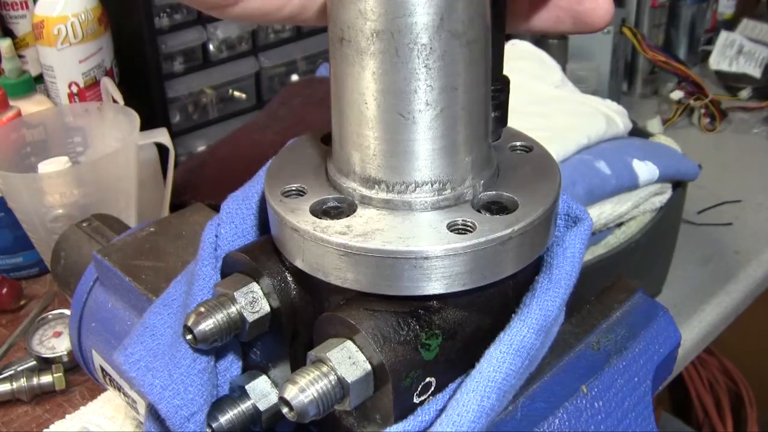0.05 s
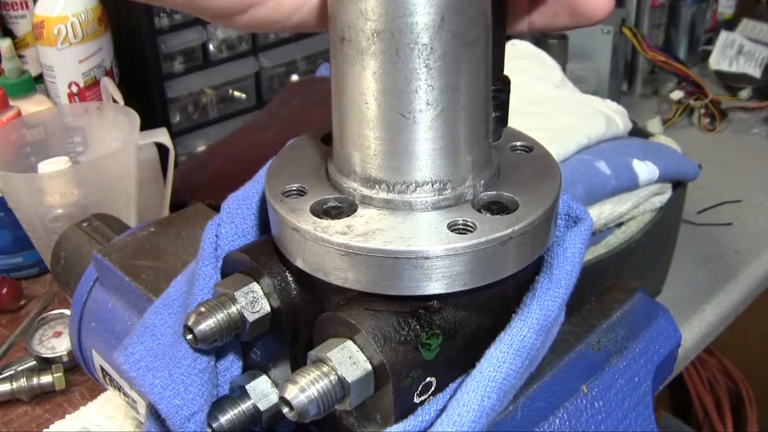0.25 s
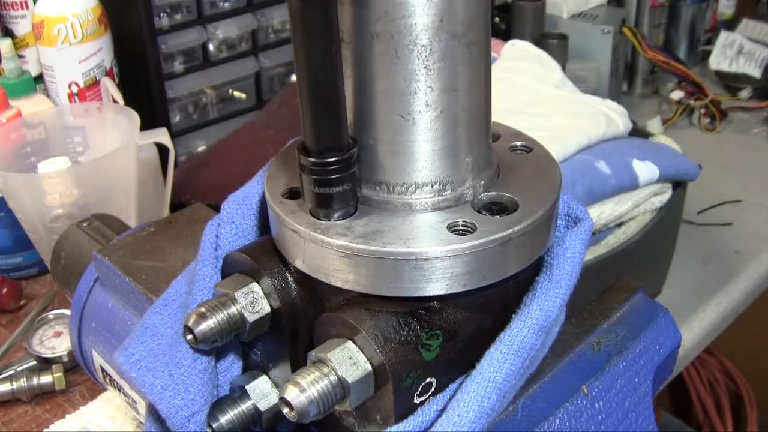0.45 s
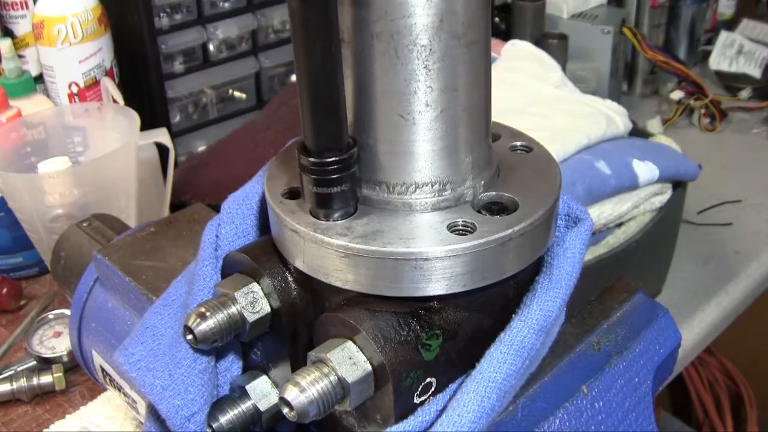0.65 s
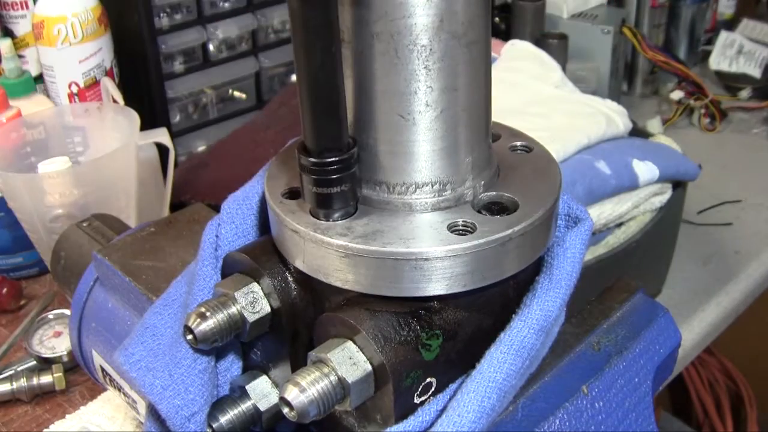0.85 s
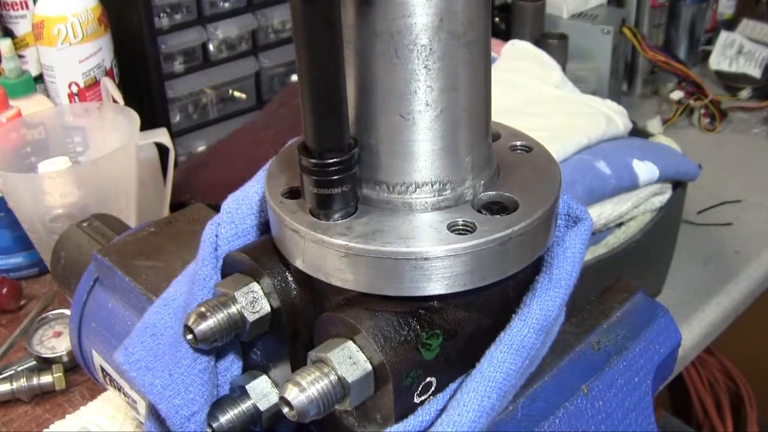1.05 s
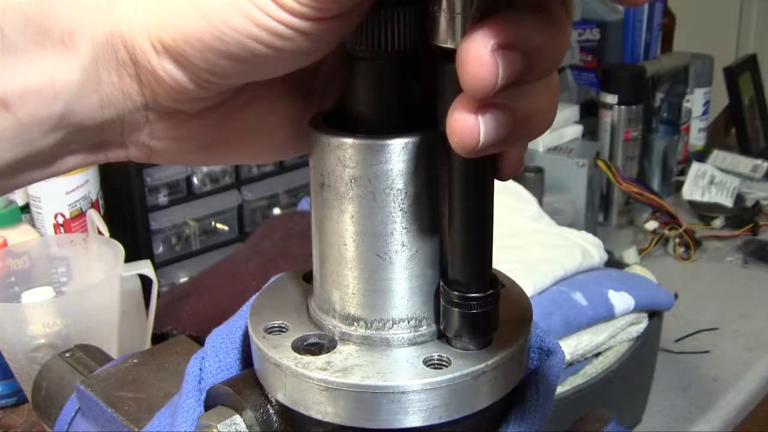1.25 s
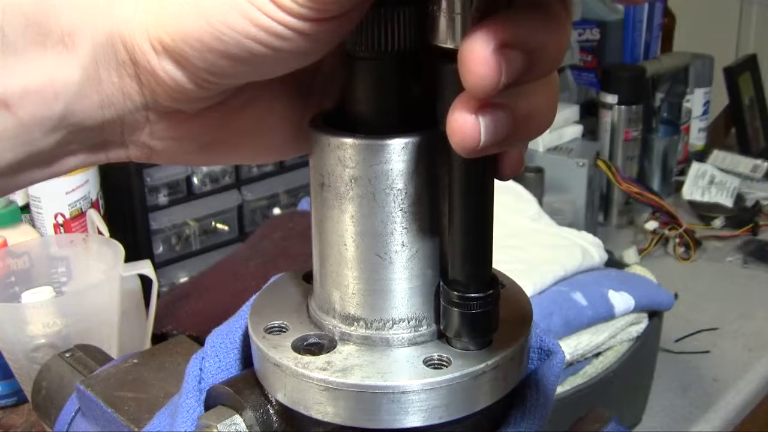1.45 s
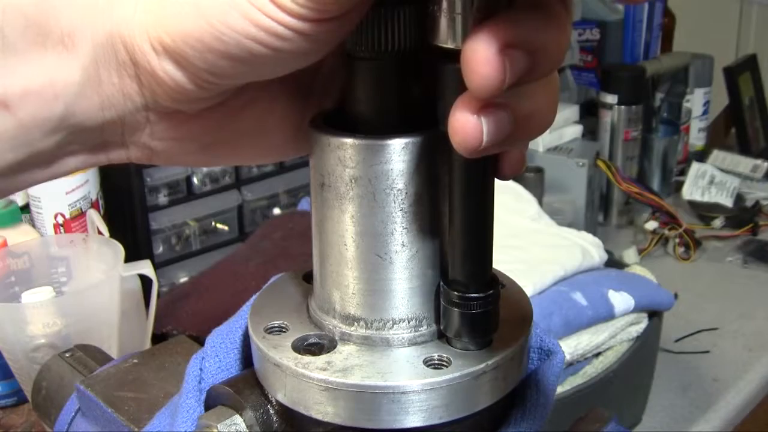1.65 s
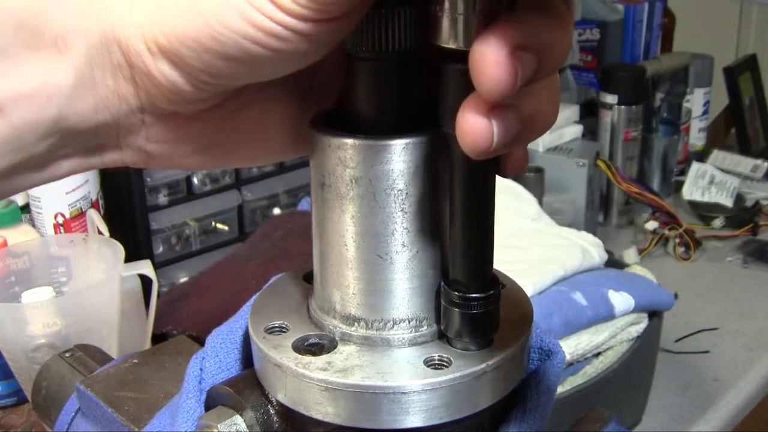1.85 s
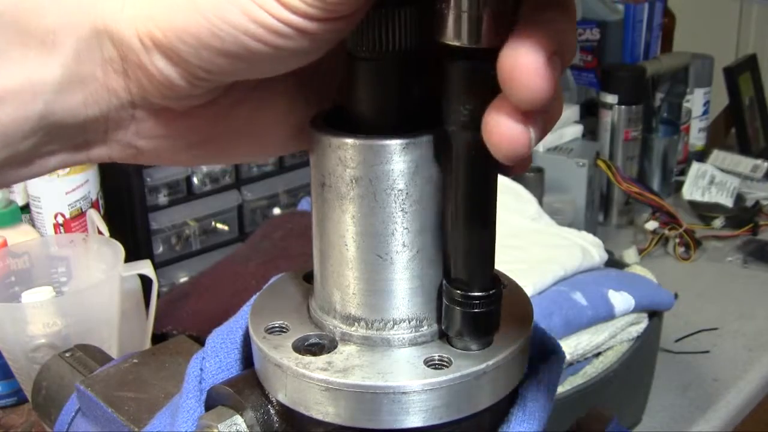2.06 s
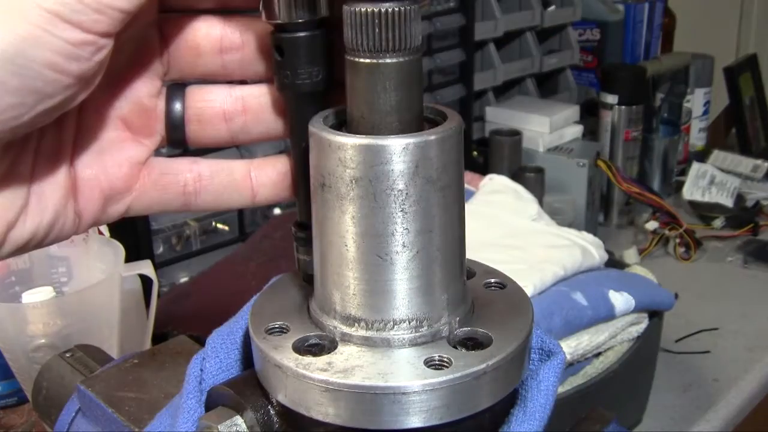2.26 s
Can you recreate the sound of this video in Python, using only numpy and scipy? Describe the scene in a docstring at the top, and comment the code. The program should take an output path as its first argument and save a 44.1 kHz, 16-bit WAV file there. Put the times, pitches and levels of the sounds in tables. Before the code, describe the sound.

Five sharp, close metal snaps come in quick succession as a socket wrench loosens bolts, each followed by a dull workbench thump. Light socket taps and a short rattle fall between them, over faint rumble in a small garage.

```python
"""A soft rustle dies away over faint low rumble and hiss in a small garage. From 0.2 s a socket on a long
extension cracks five bolts loose on a metal flange held in a bench vice. Each lets go with one sharp
snap that rings the steel briefly; the bench clunks and booms just behind it, and the garage answers.
The socket taps twice after the first bolt and rattles after the third, each time with a dull nudge of
the bench. The fifth bolt goes at 1.9 s, and one last light tap follows."""
import sys
import numpy as np
from scipy import signal
from scipy.io import wavfile
from scipy.ndimage import map_coordinates

SR = 44100
rng = np.random.default_rng(int(sys.argv[2]) if len(sys.argv) > 2 else 0)


def unload_audio(sound):
    """Save the sound as a 16-bit wav file, at the path given as the first command line argument."""
    columns = np.transpose(np.atleast_2d(sound))
    # keep every value between -1 and 1, then stretch to whole-number steps
    steps = np.round(np.clip(columns, -1, 1) * 32767)
    wavfile.write(sys.argv[1], SR, steps.astype(np.int16))


N = 105840
TIME = np.arange(N) / SR

# tone of the noise bed, the opening rustle and the bench's shudder: frequency_hz, density_db
BED_SPECTRUM = [(15, -43), (25, -24.5), (64, -2), (108, -12.5), (134, -21), (263, -10.5), (354, -24.5),
                (384, -22), (451, -18), (887, -27), (1370, -26.5), (13600, -47), (16000, -58)]
RUSTLE_SPECTRUM = [(60, -2), (300, 4.5), (1300, -8), (4000, -13.5), (6500, -22.5), (12000, -36.5)]
SHUDDER_SPECTRUM = [(30, -29), (47, -16), (68, -1), (100, 0.5), (150, -9), (220, -6.5), (330, -4.5),
                    (480, -19), (1000, -40)]
# fader ride on the rumble: time_s, level_db
RUMBLE_RIDE = [(0.0, -52.5), (0.33, -51.5), (0.49, -54.5), (0.66, -58.5), (1.08, -51.5), (1.3, -59),
               (1.72, -60.5), (2.02, -57.5), (2.4, -59)]
# how alike left and right are in diffuse sound: frequency_hz, likeness (0-1)
STEREO_LIKENESS = [(80, 0.97), (300, 0), (1200, 0.6), (5000, 0.6), (12000, 0)]
# reflections from the clutter on the bench, and the garage tail: frequency_hz, level_db, t60_s
CLUTTER_REVERB = [(80, -23.5, .06), (400, -4.5, .07), (1200, 1, 0.096), (3000, -3.5, 0.014),
                  (7000, -11.5, .035), (15000, -9, .03)]
GARAGE_REVERB = [(80, -18, 1), (324, -9.5, 0.35), (600, -12.5, 0.49), (1239, -3.5, 0.38), (2400, -15, .34),
                 (4100, -16.5, 0.38), (4870, -16, 0.12), (6340, -17.5, .34), (10000, -14.5, 0.097),
                 (15000, -23.5, .2)]
# bands that cancel on the direct path to the microphone: centre_hz, width_hz, depth (0-1)
PATH_NOTCHES = [(930, 330, 0), (5230, 290, 0.1), (8240, 280, 0.8)]

# resonances: pitch_hz, width_hz, level_db
BOOM_MODES = [(75.6, 8.7, 0), (87.3, 15, 18), (134, 8, 11), (195, 12, 10.5)]  # bench and room, slow to build
CLUNK_MODES = [(275, 17, 2), (342, 100, 3), (400, 110, -2.5)]  # hollow bench top
TAP_MODES = [(646, 120, 4.5), (1050, 410, 8.5), (1814, 1200, 2.5), (2750, 500, 5), (3650, 900, 2.5),
             (5370, 900, 0.5), (8890, 960, -1)]  # woken by a light touch
WRENCH_MODES = [(2143, 62, -4), (2916, 350, -10.5), (8300, 350, -12.5), (9630, 600, -10)]  # damped, the same for every bolt
BITE_MODES = [(3083, 700, -11), (3872, 510, 3), (4328, 520, -2.5)]  # the socket's bite
BRIGHT_MODES = [(5800, 190, -13.5), (6290, 240, -0.5), (6756, 280, -7.5), (7287, 260, -8), (9784, 600, -8)]  # the bolt's bright edge
KNOCK_MODES = [(557, 100, -4.5), (670, 60, 2)]  # damped flange and vice
BAR_RINGS = [
    [(990, 69, -3)],
    [(1243.4, 69, -6), (1310, 63, -1)],
    [(1650, 130, -2.5)],
]  # longer rings of the extension bar, in three sets: low, middle, high
AFTER_RING_MODES = [(1307, 4, -7), (1344.3, 8, -11), (1400, 4.8, -18.5)]  # faint, goes with the middle ring
SPRAY_BANDS = [(1920, 1600, -9), (3000, 580, -10.5), (5200, 810, -8.5), (7900, 2000, -12)]  # the snap's even spray into the room
# wave round trips in the steel: delay_s, feedback (0-1)
ROUND_TRIPS = [(.00033, 0.67), (.00015, 0.17)]

# dull nudges of the bench: start_s, boom_db, clunk_db
BENCH_NUDGES = [(0.441, -14.5, -8), (1.192, -13, 0.5)]
# light touches of the socket: start_s, level_db, contact_cutoff_hz
SOCKET_TOUCHES = [(0.385, -28.5, 3580), (0.4522, -30, 3526), (1.1668, -17.5, 3550), (1.1789, -13.5, 15000),
                  (1.2012, -21, 8050), (1.2055, -22.5, 7000), (1.2094, -33, 13200), (1.2159, -27.5, 10000),
                  (1.2611, -20.5, 10000), (1.2636, -31.5, 11000), (2.064, -29, 8800)]
# bolts letting go: start_s, snap_db, contact_cutoff_hz, knock_db, socket_hz, socket_db, bite_db,
# bright_db, low_ring_db, middle_ring_db, high_ring_db, notch_hz, pan_db, room_db, boom_db, clunk_db
BOLT_CRACKS = [(0.1999, 18, 9000, 0.5, 2337, 20.5, 1, 5, 21, 27.5, 18, 3120, -1, 0, 6.5, 8),
               (0.6747, 17, 15000, -2, 2190, 5, 1, 7, -2.5, 12.5, 9.5, 2877, 1.5, 0.5, 4, 10.5),
               (0.987, 19, 8860, 0.5, 2394, 18, -1, 3, 24.5, 21.5, 14, 1960, 0.5, .5, 5, 6),
               (1.508, 14.5, 4600, -0.5, 2510, 14.5, 0.5, -0.5, -24, 9, 15, 2305, -3.5, -4, -2.5, 4),
               (1.8753, 19, 5940, 0, 2714, 16.5, 2, 2.5, 2, 24, 4.5, 2240, -4, -3.5, 1, -0.5)]


def from_db(db):
    """Decibels to gain."""
    return 10 ** (np.asarray(db) / 20)


def at_hz(table, hz, column=1):
    """Read a column of a table on a log-frequency axis."""
    table = np.array(table)
    return np.interp(np.log(hz), np.log(table[:, 0]), table[:, column])


def cut(x, hz, kind="low", order=2):
    """Butterworth filter."""
    sections = signal.butter(order, np.clip(hz, 10, .45 * SR), kind, fs=SR, output="sos")
    return signal.sosfilt(sections, x + 1e-18)


def click(start_s, level_db):
    """One impulse."""
    return from_db(level_db) * (np.arange(N) == int(start_s * SR))


def resonate(x, hz, width_hz):
    """One resonance, unity gain at its peak."""
    radius = np.exp(-np.pi * width_hz / SR)
    poles = [1, -2 * radius * np.cos(2 * np.pi * hz / SR), radius ** 2]
    return signal.lfilter(np.array([1, 0, -1]) * (1 - radius ** 2) / 2, poles, x + 1e-18)


def notch(x, hz, width_hz, depth):
    """Scoop out one band; depth 1 cancels its centre."""
    return x - depth * resonate(x, hz, width_hz)


def body(x, modes):
    """Resonances in parallel, polarity alternating."""
    return sum((-1) ** k * from_db(db) * resonate(x, hz, width) for k, (hz, width, db) in enumerate(modes))


def swell(x, modes):
    """Resonances applied twice, so that they bloom before they fade."""
    return sum(from_db(db) * resonate(resonate(x, hz, width), hz, width) for hz, width, db in modes)


def noise_bands(size):
    """Half-octave bands of stereo white noise, as (centre_hz, band)."""
    edges = 22 * 2 ** np.arange(0, 10, .5)
    white = rng.standard_normal((2, 2, size + SR // 4))
    for k, (low, high) in enumerate(zip(edges, edges[1:])):
        mid, side = cut(white[k % 2], [low, high], "band")[:, -size:]
        hz = np.sqrt(low * high)
        alike = np.clip(at_hz(STEREO_LIKENESS, hz), 0, 1)
        yield hz, np.sqrt((1 + alike) / 2) * mid + np.sqrt((1 - alike) / 2) * side * [[1], [-1]]


def coloured(spectrum):
    """Steady stereo noise with the given tone, rms 1."""
    noise = sum(from_db(at_hz(spectrum, hz)) * band for hz, band in noise_bands(N))
    return noise / noise.std()


def pan(x, pan_db, treble_pan_db=2.03):
    """Pan the lows and mids (positive is left); the treble stays just left of centre."""
    lows, sides = cut(x, 4000, order=1), np.array([[.5], [-.5]])
    return lows * from_db(pan_db * sides) + (x - lows) * from_db(treble_pan_db * sides)


def background():
    """The bed: a drifting low rumble, faint steady hiss and a soft rustle dying away at the start."""
    bed, split_hz, rumble_trim_db = coloured(BED_SPECTRUM), 200, -1.5
    ride_db = np.interp(TIME, *np.transpose(RUMBLE_RIDE))
    rumble = from_db(ride_db + rumble_trim_db) * cut(bed, split_hz, order=1)
    hiss = from_db(-60) * cut(cut(bed, split_hz, "high", order=1), 14200, order=4)
    rustle = from_db(-51.5) * np.exp(-TIME / 0.033) * coloured(RUSTLE_SPECTRUM)
    return rumble + hiss + rustle


def reflections(send, reverb, delay_s, width):
    """Diffuse reverb, each band dying at its own rate; width is the share of side signal kept."""
    age, response = TIME[:SR] - delay_s, 0
    for hz, band in noise_bands(SR):
        t60_s = at_hz(reverb, hz, column=2)
        fade = (age > 0) * from_db(-60 * np.maximum(age, 0) / t60_s)
        response = response + from_db(at_hz(reverb, hz)) * band * fade / np.linalg.norm(fade)
    response = width * response + (1 - width) * response.mean(axis=0)
    return signal.fftconvolve(send[None], response, axes=1)[:, :N]


def direct_path(x, left_lag_s=6e-6):
    """Narrow bands cancel on the way to the microphone, whose left port is slightly further away."""
    for hz, width_hz, depth in PATH_NOTCHES:
        x = notch(x, hz, width_hz, depth)
    left = map_coordinates(x[0], [np.arange(N) - left_lag_s * SR], order=3)
    return np.array([left, x[1]])


def bench_boom(rise_s=0.025, decay_s=0.056):
    """Released torque or a nudge shakes the bench: a clunk, a late boom and a diffuse shudder."""
    boom_hits = clunk_hits = shake = 0
    for start_s, *_, boom_db, clunk_db in BOLT_CRACKS + BENCH_NUDGES:
        boom_hits += click(start_s + .015, boom_db)
        clunk_hits += click(start_s + .014, clunk_db)
        age = np.maximum(TIME - start_s, 0)
        shake += from_db(boom_db - 42) * (1 - np.exp(-age / rise_s)) * np.exp(-age / decay_s)
    shudder = shake * coloured(SHUDDER_SPECTRUM)[0]
    return swell(boom_hits, BOOM_MODES) + swell(clunk_hits, CLUNK_MODES) + shudder


def smear(x):
    """Round trips in the steel, as short allpasses, spread a transient over a millisecond or two."""
    for delay_s, feedback in ROUND_TRIPS:
        taps = np.zeros(int(delay_s * SR) + 1)
        taps[0], taps[-1] = 1, feedback
        x = signal.lfilter(taps[::-1], taps, x)
    return x


def struck_steel(hit, bite_db, bright_db):
    """The short modes of wrench, socket and bolt, with the bare click underneath."""
    socket = from_db(bite_db) * body(hit, BITE_MODES)
    bolt = from_db(bright_db) * body(hit, BRIGHT_MODES)
    bare_click = from_db(-17) * cut(hit, 220, "high")
    return body(hit, WRENCH_MODES) + socket + bolt + bare_click


def socket_rattle():
    """The socket taps on the bolt heads, so lightly that socket and bolt hardly wake."""
    taps = 0
    for start_s, level_db, contact_hz in SOCKET_TOUCHES:
        hit = click(start_s, level_db)
        tap = struck_steel(hit, bite_db=-5, bright_db=-22) + body(hit, TAP_MODES)
        taps += cut(tap, contact_hz, order=4)
    return smear(taps)


def bolt_cracks():
    """Each bolt snaps free; seat and grip decide which modes ring most. Yields (sound, pan_db, send)."""
    for (start_s, snap_db, contact_hz, knock_db, socket_hz, socket_db, bite_db, bright_db,
         low_db, middle_db, high_db, notch_hz, pan_db, room_db, *_) in BOLT_CRACKS:
        snap = struck_steel(click(start_s, snap_db), bite_db, bright_db)
        knock = body(click(start_s, snap_db + knock_db), KNOCK_MODES)
        rings = resonate(click(start_s, socket_db), socket_hz, width_hz=240)
        rings += body(click(start_s, middle_db), AFTER_RING_MODES)
        for modes, ring_db in zip(BAR_RINGS, (low_db, middle_db, high_db)):
            rings += body(click(start_s, ring_db), modes)
        crack = smear(cut(snap + knock + rings, contact_hz))
        spray = cut(body(click(start_s + .004, snap_db), SPRAY_BANDS), contact_hz)
        send = from_db(room_db) * (from_db(-1) * crack + spray)
        direct = notch(crack, notch_hz, width_hz=230, depth=1)  # each grip cancels one narrow band
        yield direct, pan_db, send


def scene():
    """Close tool sounds near the centre and their reverb, top octave shelved down, over the bed."""
    handling, handling_pan_db = socket_rattle() + bench_boom(), -0.77
    sources = [*bolt_cracks(), (handling, handling_pan_db, handling)]
    direct = direct_path(sum(pan(sound, pan_db) for sound, pan_db, _ in sources))
    room_send = sum(send for _, _, send in sources)
    clutter = reflections(room_send, CLUTTER_REVERB, delay_s=.0013, width=.4)
    garage = reflections(room_send, GARAGE_REVERB, delay_s=.007, width=.9)
    tools, shelf_hz = direct + clutter + garage, 11000
    air = from_db(-14) * cut(tools, shelf_hz, "high", order=5)
    return cut(tools, shelf_hz, order=5) + air + background()


def record(dry, ceiling=.98, cutoff_hz=16543):
    """A soft clip rounds the highest peaks; a steep low-pass takes off the very top."""
    rounded = dry / (1 + (dry / ceiling) ** 8) ** (1 / 8)
    return signal.sosfilt(signal.cheby2(16, 60, cutoff_hz, fs=SR, output="sos"), rounded)


dry = scene()
out = record(dry)
unload_audio(out)
```